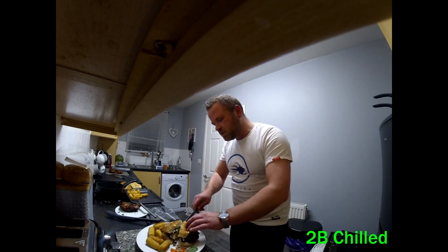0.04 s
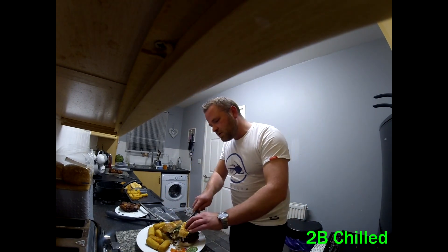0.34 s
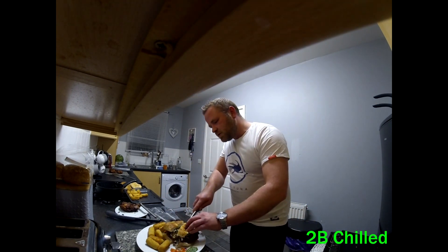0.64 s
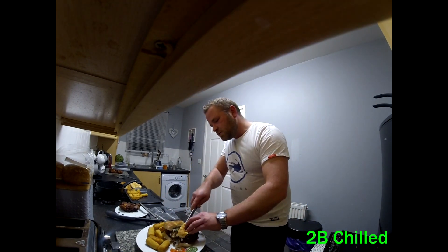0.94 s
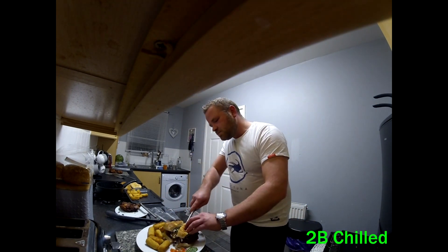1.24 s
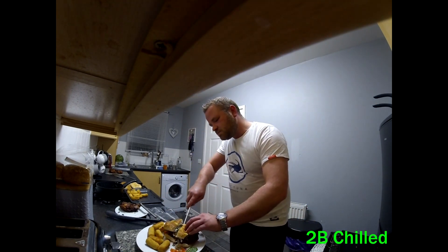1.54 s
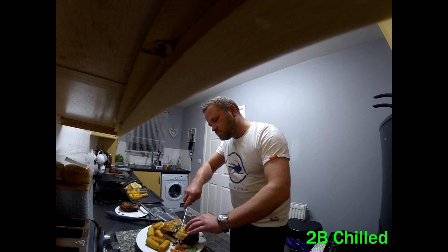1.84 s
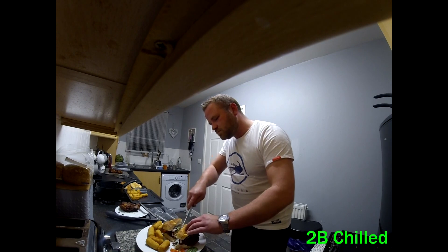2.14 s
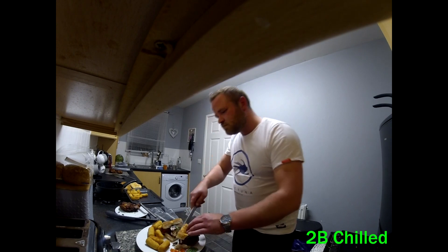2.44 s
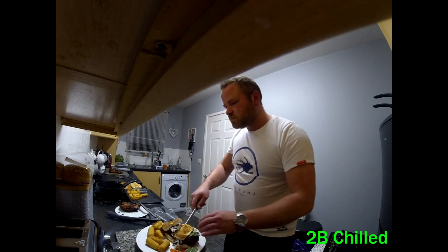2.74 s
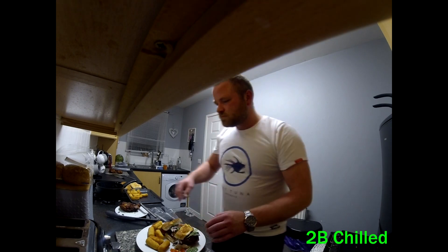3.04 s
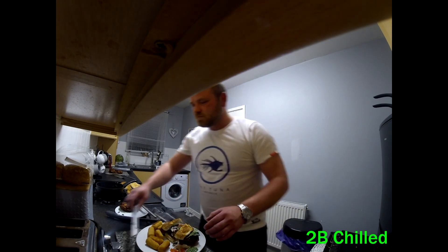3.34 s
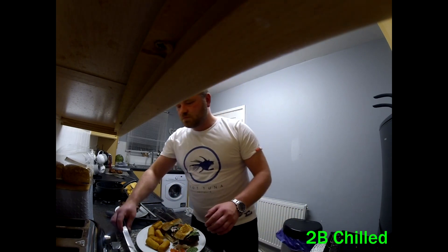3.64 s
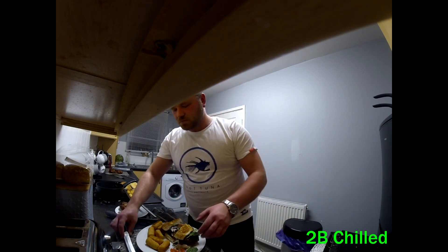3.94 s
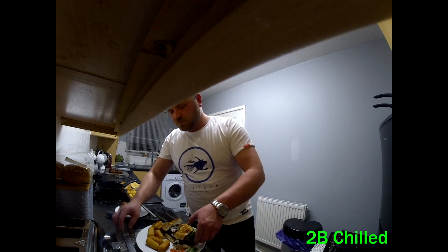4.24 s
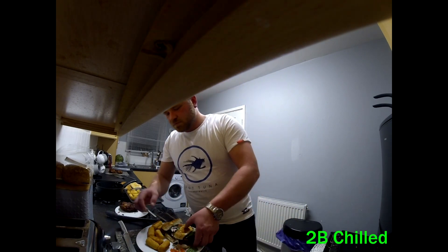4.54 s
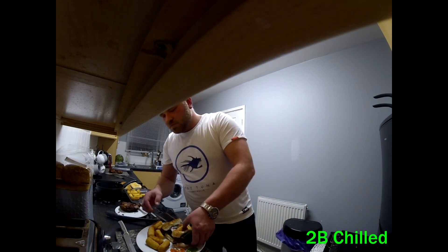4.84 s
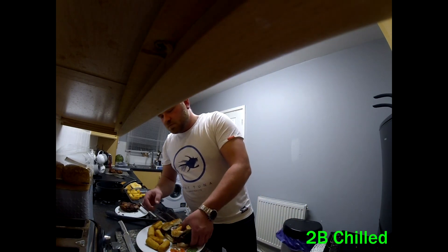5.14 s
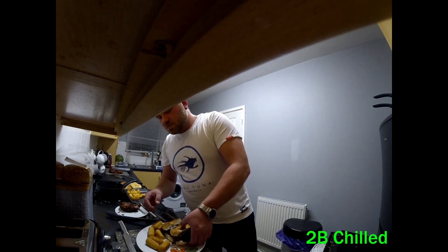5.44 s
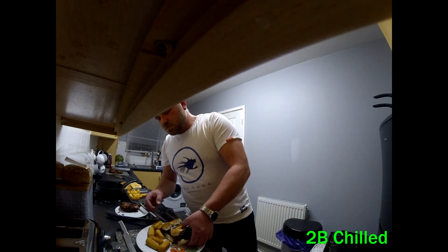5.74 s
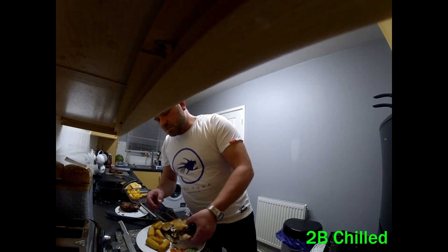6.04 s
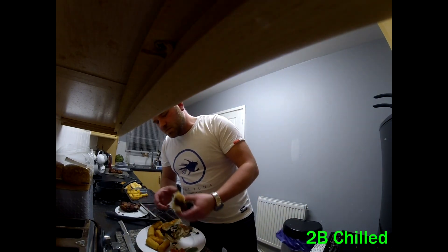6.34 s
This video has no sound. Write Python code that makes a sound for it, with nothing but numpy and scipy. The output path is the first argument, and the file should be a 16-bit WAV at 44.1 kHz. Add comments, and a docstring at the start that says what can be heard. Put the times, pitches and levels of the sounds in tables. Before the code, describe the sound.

Quiet crunchy cutting with two sharp clinks of steel on china, followed by a knife dropped flat with a short clatter.

```python
"""Table knife on a china plate

In a small hard kitchen a knife saws through crusty food and twice slips onto the china, which rings.
The cook shifts weight, touches the knife to the worktop and drops it flat with a short steel clatter.
Behind it: hiss and the faint pulsing whine of a camera's electronics."""
import sys
import numpy as np
from scipy import signal
from scipy.fft import rfft, irfft, next_fast_len
from scipy.io import wavfile
from scipy.ndimage import uniform_filter1d, map_coordinates

SR = 44100
rng = np.random.default_rng(int(sys.argv[2]) if len(sys.argv) > 2 else 0)


def unload_audio(sound):
    """Save the sound as a 16-bit wav file, at the path given as the first command line argument."""
    columns = np.transpose(np.atleast_2d(sound))
    # keep every value between -1 and 1, then stretch to whole-number steps
    steps = np.round(np.clip(columns, -1, 1) * 32767)
    wavfile.write(sys.argv[1], SR, steps.astype(np.int16))


N = 290468
AGE_S = np.arange(3 * SR // 4) / SR  # time axis of one event

# food-damped plate modes: (frequency [Hz], struck mid-plate [dB], struck near rim [dB], t60 [s])
PLATE_MODES = [(1690, -5, 0, .06), (1745, 0, -4, .07), (1828, -2, -2, .07), (2078, -18, -13, .08),
               (2283, -16, -12, .08), (2700, -22, -21, .06), (3160, -20, -17, .08), (4010, -22, -14, .07),
               (4174, -10, -7, .12), (4540, -18, -23, .06), (4635, -13, -21, .1), (4840, -21, -22, .12),
               (5440, -25, -16, .15), (6500, -21, -25, .06), (7130, -23, -24, .1), (8030, -29, -42, .13),
               (9090, -35, -42, .12), (9545, -42, -33, .15), (11320, -34, -46, .18), (12930, -34, -30, .1),
               (14400, -42, -43, .1)]
# worktop modes: (frequency [Hz], level [dB], t60 [s])
WORKTOP_MODES = [(120, -9, .2), (180, -8, .2), (209, 0, .25), (270, -10, .15), (702, -6, .15),
                 (750, 2, .25)]


def plate_clinks(chatter_s=.008, chatter_db=-1, choke_s=.015, choke_db=-17):
    """The blade hits the china and chatters once; the plate's foot knocks the worktop."""
    # (time [s], ring [dB], crack [dB], knock [dB], place [0 middle, 1 rim])
    clinks = [(0.7129, -26.5, -38.5, -53, 0.16), (1.0350, -34, -46, -71, 1)]
    # steel-on-china contact: (frequency [Hz], density [dB])
    crack_spectrum = [(50, -21.5), (110, -3.5), (210, 5.5), (330, -1), (400, -3), (480, -4), (900, 0.5),
                      (1080, -20), (1400, -14.5), (2200, 2), (4800, -5.5), (7000, -10.5), (7800, -19),
                      (11000, -20.5), (15000, -28)]
    out = np.zeros(N)
    blows = [(0, 0), (chatter_s, chatter_db)]
    # the blade stays pressed on and chokes most of the ring
    free = 1 / (1 + (AGE_S / choke_s) ** 20)
    damping = free + amp(choke_db) * (1 - free)
    for start_s, ring_db, crack_db, knock_db, place in clinks:
        modes = struck_at(PLATE_MODES, place)
        china = ring(modes, blows, damping, attack_s=.002, wet_db=-5.5, build_s=.0085)
        knock = ring(WORKTOP_MODES, blows, damping, attack_s=.0033, wet_db=-7.5, build_s=.004)
        crack = kitchen(contact_noise(crack_spectrum, blows, t60_s=.0352, attack_s=.00079), wet_db=-2)
        add(out, start_s, amp(ring_db) * china + amp(knock_db) * knock + amp(crack_db) * crack)
    return out


def knife_drop():
    """The tip touches, then the knife falls flat and rattles; steel and worktop ring."""
    # (time [s], ring [dB], tick [dB], knock [dB], clack [dB], lie [0 tip, 1 flat])
    landings = [(3.8176, -57.5, -56, -60, -88, 0.07), (4.0805, -35.5, -40, -40.5, -36, 0.97)]
    # rattle of a flat landing: (delay [s], blade [dB], handle [dB])
    bounces = [(0, 4, 0.5), (.0045, 2, -7), (0.011, -15, -9.5), (0.0202, -5, 0.5), (.031, -23, -2)]
    # (frequency [Hz], on tip [dB], lying flat [dB], t60 [s])
    knife_modes = [(1032, -25, -7, .2), (1131, -25, -6, .2), (1235, -18, -6, .2), (1341, -25, -1, .22),
                   (1857, -8, -10, .2), (2043, -12, -7, .15), (3171, -8, -9, .25), (3736, -14, -6, .28),
                   (4425, -4, -25, .17), (5053, -6, -1, .24), (5843, -5, 0, .24), (5885, 0, -6, .17),
                   (6240, -13, -9, .26), (6715, -19, 0, .27), (6960, -18, -3, .26), (8419, -3, -5, .22),
                   (9669, -6, -4, .18), (10073, -8, -4, .18), (11020, -3, 0, .19), (12580, -10, -6, .16),
                   (13750, -24, -20, .2), (14200, -16, -14, .18), (14940, -24, -14, .17)]
    # hard edge: (frequency [Hz], density [dB])
    tick_spectrum = [(200, 5), (1200, -8.5), (2000, -1.5), (6800, -3.5), (7700, -10), (9800, 0.5),
                     (11200, 4.5), (11700, -3), (12600, 1), (13300, -15), (15000, -15)]
    # flat handle: (frequency [Hz], density [dB])
    clack_spectrum = [(30, -40), (70, -10), (130, 5.5), (330, -8.5), (450, -7), (750, 0.5), (950, -3),
                      (1200, 6.5), (1550, -1), (2100, -1), (2800, -7), (4000, -11), (7000, -10.5),
                      (14000, -34)]
    out = np.zeros(N)
    for start_s, ring_db, tick_db, knock_db, clack_db, lie in landings:
        contacts = np.array(bounces if lie > .5 else bounces[:1])
        blade, handle = contacts[:, [0, 1]], contacts[:, [0, 2]]
        modes = struck_at(knife_modes, lie)
        steel = ring(modes, blade, damping=1, attack_s=.0018, wet_db=-4.5, build_s=.0046)
        knock = ring(WORKTOP_MODES, handle, damping=1, attack_s=.0022, wet_db=-6.5, build_s=.0025)
        tick = kitchen(contact_noise(tick_spectrum, blade, t60_s=.045, attack_s=.00022), wet_db=-.5)
        clack = kitchen(contact_noise(clack_spectrum, handle, t60_s=.042, attack_s=.00033), wet_db=6)
        add(out, start_s, amp(ring_db) * steel + amp(tick_db) * tick)
        add(out, start_s, amp(knock_db) * knock + amp(clack_db) * clack)
    return out


def cutting(grains_per_s=1200, spread_db=4, china_db=-6, centre_hz=2650, width_oct=.27):
    """Strokes and snaps break many tiny grains of crust, which faintly excite the plate."""
    # blade pushed through crust: (start [s], length [s], level at full pressure [dB])
    strokes = [(0.071, 0.68, -48.5), (1.28, 0.13, -48.5), (1.679, 0.286, -56.5), (2.108, 0.09, -59.5)]
    # larger pieces giving way: (time [s], level [dB])
    snaps = [(0.430, -53.5), (0.524, -47.5), (1.378, -48), (1.535, -56.5), (1.872, -57), (2.138, -54),
             (2.398, -56), (2.664, -57.5), (4.99, -61.5)]
    # (frequency [Hz], density [dB])
    crust_spectrum = [(120, 0), (450, -0.5), (780, 0.5), (1300, -2.5), (2800, -1.5), (5000, -9),
                      (10000, -13.5), (15000, -19)]
    out = np.zeros(N)
    # under pressed food the plate rings briefly, most near the grains' own pitch
    plate_response = np.zeros(len(AGE_S))
    for hz, _, rim_db, _ in PLATE_MODES:
        coupling = 1 / (1 + (np.log2(hz / centre_hz) / width_oct) ** 2)
        plate_response += amp(rim_db) * coupling * np.sin(2 * np.pi * hz * AGE_S)
    plate_response *= fade(t60_s=.07014, attack_s=.0012)
    efforts = [(start_s, amp(db) * pressure(length_s)) for start_s, length_s, db in strokes]
    efforts += [(start_s, amp(db) * fade(t60_s=.13, attack_s=.002)) for start_s, db in snaps]
    for start_s, effort in efforts:
        breaks = rng.random(len(AGE_S)) < grains_per_s / SR
        grains = breaks * np.sign(noise()) * amp(spread_db * noise()) * effort
        china = unit(signal.fftconvolve(grains, plate_response)[:len(AGE_S)])
        crunch = coloured(grains, crust_spectrum) + amp(china_db) * china
        effort_rms = np.sqrt(np.mean(effort ** 2))
        add(out, start_s, effort_rms * kitchen(crunch, wet_db=-1))
    return out


def pressure(length_s, rise_db=15, curve=3.12, release_s=.012):
    """One stroke: the hand leans in ever harder until the blade is through, then lets go."""
    progress = np.minimum(AGE_S / length_s, 1)
    release = np.exp(-np.maximum(AGE_S - length_s, 0) / release_s)
    return amp(rise_db * (progress ** curve - 1)) * release


def glaze_rubs(width_hz=110):
    """Steel rubbing on the glaze makes one resonance sing faintly."""
    # (start [s], level before length scaling [dB], length [s], pitch [Hz])
    rubs = [(0.198, -66, 0.83, 1350), (1.288, -56.5, 0.14, 1760), (1.729, -67, 0.12, 1700)]
    out = np.zeros(N)
    for start_s, db, length_s, pitch_hz in rubs:
        tone = filtered(noise(), lambda hz: 1 / (1 + ((hz - pitch_hz) / width_hz) ** 2))
        push = np.sin(np.pi * np.minimum(AGE_S / length_s, 1)).clip(0) ** .5
        add(out, start_s, amp(db) * np.sqrt(length_s) * kitchen(tone * push, wet_db=-2))
    return out


def footfalls():
    """Soles bump softly on the floor as the weight shifts."""
    # (time [s], level [dB])
    steps = [(3.015, -63.5), (3.205, -68.5)]
    # (frequency [Hz], density [dB])
    sole_spectrum = [(60, -3.5), (200, -2), (550, 9.5), (900, 4), (1200, -10), (2000, -7.5), (5000, -28),
                     (12000, -42)]
    out = np.zeros(N)
    for start_s, db in steps:
        bump = coloured(noise() * fade(t60_s=.12, attack_s=.014), sole_spectrum)
        add(out, start_s, amp(db) * kitchen(bump, wet_db=-1.5))
    return out


def hiss(level_db=-56):
    """Steady room and microphone noise."""
    # (frequency [Hz], density [dB])
    hiss_spectrum = [(10, -20), (20, -0.5), (37, -0.5), (96, -3.5), (200, -9), (420, -15.5), (1000, -21.5),
                     (2300, -25.5), (5800, -32.5), (8000, -32.5), (11500, -37.5), (13300, -34.5),
                     (15000, -41)]
    return amp(level_db) * coloured(rng.standard_normal(N), hiss_spectrum)


def whine(pitch_hz=6445, bursts_per_s=39, duty=.44, wander_hz=18):
    """A camera's electronics sing in short regular bursts, mostly at the octave."""
    wander = map_coordinates(rng.standard_normal(N // 512 + 4), [np.arange(N) / 512])
    phase = 2 * np.pi * np.cumsum(pitch_hz + wander_hz * wander) / SR
    time_s = np.arange(N) / SR
    busy = (time_s * bursts_per_s + .5) % 1 < duty
    gate = uniform_filter1d(busy.astype(float), size=40)
    return gate * (amp(-74) * np.sin(phase) + amp(-66.5) * np.sin(2 * phase))


def kitchen(x, wet_db, tail=None):
    """Direct sound plus wall echo, at rms 1."""
    echo = signal.fftconvolve(x, wall_tail() if tail is None else tail)[:len(x)]
    return unit(unit(x) + amp(wet_db) * unit(echo))


def wall_tail(build_s=.004):
    """Random impulse response of hard walls; each band decays at its own rate."""
    # (frequency [Hz], t60 [s])
    reverb_times = [(100, 0.42), (400, 0.23), (1100, 0.4), (1800, 0.34), (5000, 0.43), (9000, .31),
                    (15000, .24)]
    hz, time_s, bands = signal.stft(noise(), SR, nperseg=256)
    decay = amp(-60 * time_s / along(reverb_times, hz)[:, None])
    tail = signal.istft(bands * decay, SR, nperseg=256)[1][:len(AGE_S)]
    return tail * (1 - np.exp(-AGE_S / build_s))


def ring(modes, blows, damping, attack_s, wet_db, build_s):
    """Struck modes decaying in the room, at rms 1."""
    tail = wall_tail(build_s)
    out = np.zeros(len(AGE_S))
    for hz, db, t60_s in modes:
        tone = np.sin(2 * np.pi * (hz * AGE_S + rng.random()))
        envelope = blow_envelope(blows, t60_s, attack_s) * damping
        out += amp(db) * kitchen(tone * envelope, wet_db, tail)
    return unit(out)


def struck_at(modes, place):
    """The place of the blow, 0 to 1, blends each mode's two levels."""
    return [(hz, np.interp(place, [0, 1], [db_0, db_1]), t60_s) for hz, db_0, db_1, t60_s in modes]


def contact_noise(spectrum, blows, t60_s, attack_s):
    """Noisy part of a quick run of blows, at rms 1."""
    return coloured(noise() * blow_envelope(blows, t60_s, attack_s), spectrum)


def blow_envelope(blows, t60_s, attack_s):
    """Each blow (delay [s], level [dB]) adds its energy to a vibration."""
    energy = np.zeros(len(AGE_S))
    for delay_s, db in blows:
        add(energy, delay_s, (amp(db) * fade(t60_s, attack_s)) ** 2)
    return np.sqrt(energy)


def fade(t60_s, attack_s):
    """Quick rise, exponential decay."""
    return amp(-60 * AGE_S / t60_s) * (1 - np.exp(-AGE_S / attack_s))


def coloured(x, spectrum):
    """x through a minimum-phase filter of this spectrum, at rms 1."""
    size = 2 * next_fast_len(len(x) // 2 + 4096)
    gain = amp(along(spectrum, np.fft.rfftfreq(size, 1 / SR)))
    cepstrum = irfft(np.log(gain), size)
    cepstrum[1:size // 2] *= 2
    cepstrum[size // 2 + 1:] = 0
    response = np.exp(rfft(cepstrum))
    return unit(irfft(rfft(x, size) * response, size)[:len(x)])


def filtered(x, gain):
    """x through a zero-phase filter, gain(hz)."""
    size = next_fast_len(len(x) + SR // 4)
    return irfft(rfft(x, size) * gain(np.fft.rfftfreq(size, 1 / SR)), size)[:len(x)]


def along(points, hz):
    """Interpolate (frequency [Hz], value) points on a log axis."""
    points_hz, values = np.transpose(points)
    return np.interp(np.log(hz + 1), np.log(points_hz + 1), values)


def noise():
    """White noise, one event long."""
    return rng.standard_normal(len(AGE_S))


def add(track, start_s, sound):
    """Mix sound into track in place."""
    part = track[round(start_s * SR):][:len(sound)]
    part += sound[:len(part)]


def amp(db):
    """Decibels to gain."""
    return 10 ** (np.asarray(db) / 20)


def unit(x):
    """Scale to rms 1."""
    return x / np.sqrt(np.mean(x ** 2) + 1e-20)


def scene():
    """All sources, mono."""
    return (plate_clinks() + knife_drop() + cutting() + glaze_rubs() + footfalls() + hiss() + whine())[None]


def record(dry):
    """Soft peak limiter, then a steep low-pass."""
    ceiling, cutoff_hz = .85, 15200
    rounded = dry[0] / (1 + (dry[0] / ceiling) ** 4) ** .25
    return filtered(rounded, lambda hz: 1 / np.sqrt(1 + (hz / cutoff_hz) ** 160))[None]


dry = scene()
out = record(dry)
unload_audio(out)
```